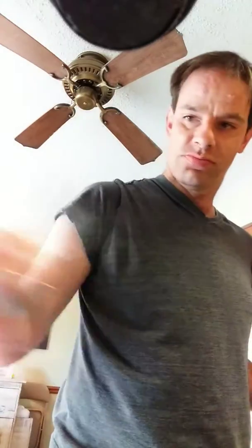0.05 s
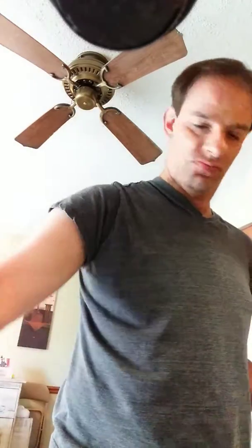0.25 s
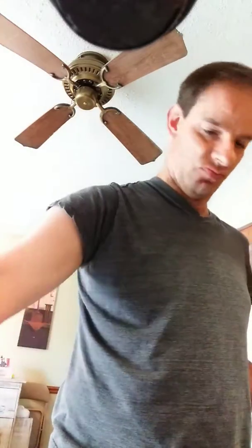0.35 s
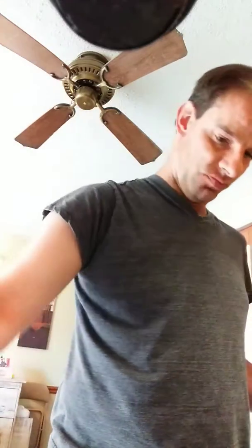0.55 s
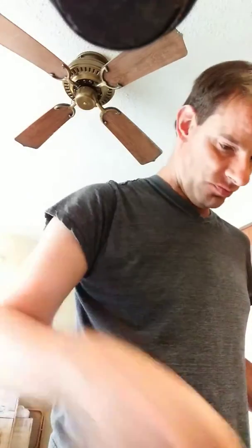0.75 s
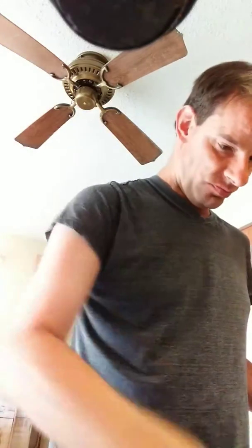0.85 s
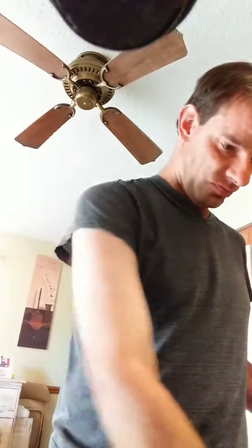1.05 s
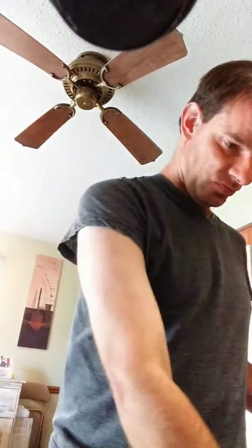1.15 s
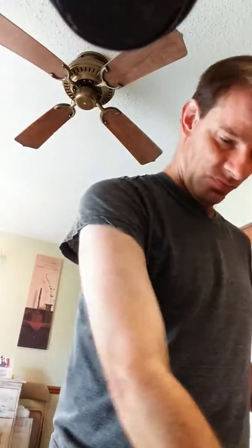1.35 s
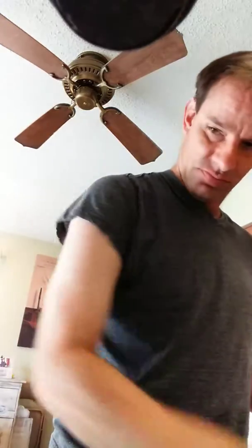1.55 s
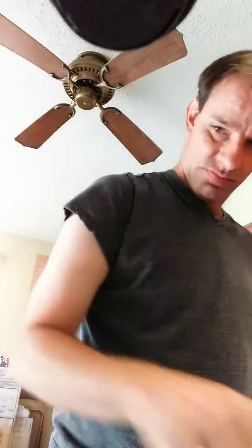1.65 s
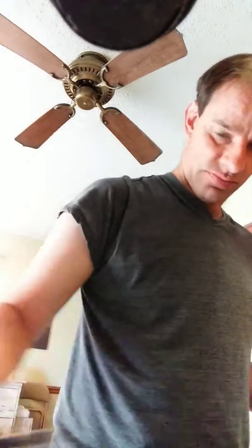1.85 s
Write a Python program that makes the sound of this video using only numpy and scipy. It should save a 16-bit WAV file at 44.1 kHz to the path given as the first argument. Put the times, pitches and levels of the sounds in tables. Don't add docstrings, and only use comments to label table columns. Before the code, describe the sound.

Dishes and cutlery clatter close to a phone in a small echoing kitchen. After quiet low hum, a heavy plate clacks at 0.24 s, a fork clinks, a bowl knocks, and a loud spoon rings left at 0.36. More steel drops at 0.47, with a rattle and hard counter thump at 0.51. A soft clink follows at 0.66, then dull taps from 0.97 to 1.25, ending in faint hum and air.

```python
import sys
import numpy as np
from scipy import signal
from scipy.fft import rfft, irfft, next_fast_len
from scipy.io import wavfile
from scipy.ndimage import map_coordinates

SR = 44100
rng = np.random.default_rng(int(sys.argv[2]) if len(sys.argv) > 2 else 0)


def boost(x):
    u = np.asarray(x, float) / 20
    return 10 ** u


def master_out(mix):
    frames = np.transpose(np.atleast_2d(mix))
    ceiling = np.clip(frames, -1, 1)
    pcm = np.round(ceiling * 32767).astype(np.int16)
    wavfile.write(sys.argv[1], SR, pcm)


N = 83790


def unit(x):
    return x / np.sqrt(np.mean(x ** 2) + 1e-20)


def along(points, hz):
    f, v = np.transpose(points)
    return np.interp(np.log(hz + 1), np.log(f + 1), v)


def curve(rows):
    s, v = np.transpose(rows)
    return np.interp(np.arange(N) / SR, s, v)


def wobble(rate):
    knots = rng.standard_normal(int(N * rate / SR) + 4)
    return map_coordinates(knots, [np.arange(N) * rate / SR])


def filtered(x, response):
    n = x.shape[-1]
    m = next_fast_len(n + 4096)
    return irfft(rfft(x, m) * response(np.fft.rfftfreq(m, 1 / SR)), m)[..., :n]


def add(out, s, x):
    part = out[:, round(s * SR):][:, :x.shape[1]]
    part += x[:, :part.shape[1]]


def sides(pan_db):
    return boost(np.array([[pan_db], [-pan_db]]) / 2)


def modal(f, depth_db=3.5, width_hz=110):
    return boost(depth_db * map_coordinates(rng.standard_normal(800), [f / width_hz]))


def ringing(t, pitches, modes, rattle_s, free_s):
    ring = 0
    touch_t60 = 0.03
    for hz, (level_db, t60) in zip(pitches, modes):
        spread_db = rng.normal(0, 1.5, (2, 1))
        start_phase = 0.1 * rng.uniform(0, 2 * np.pi)
        swell, drift = [map_coordinates(k, [t[1] * 95]) for k in rng.standard_normal((2, 64))]
        fall_db = -60 * np.maximum(t - rattle_s, 0) / t60
        fall_db = fall_db - 60 * np.maximum(t - free_s, 0) / touch_t60
        rough_db = 1.6 * swell * np.minimum(t / 0.0082, 1)
        phase = 2 * np.pi * hz * t + start_phase + 0.5 * drift * np.minimum(t / 0.0067, 1)
        ring = ring + boost(level_db + spread_db + rough_db + fall_db) * np.sin(phase)
    return ring


def clacking(t, clack_db, tilt_db, rattle_s, clack_t60, rise):
    def colour(f):
        return modal(f) * boost(tilt_db * np.log2(1 + f / 1500)) / (1 + (400 / (f + 1)) ** 3)

    noise = rng.standard_normal(t.shape) + 1.23 * rng.standard_normal(t.shape[1])
    noise = unit(filtered(noise, colour))
    when, size = rng.uniform(size=(2, 7))
    knocks = np.zeros(SR // 10)
    knocks[(when * rattle_s * SR).astype(int)] = 0.4 * size
    knocks[0] = 1
    crack_db, crack_t60 = 7, 0.0041
    fade = boost(-60 * t / clack_t60) + boost(crack_db - 60 * t / crack_t60)
    burst = boost(clack_db) * fade * noise * rise
    return signal.fftconvolve(burst, knocks[None], axes=1)[:, :t.shape[1]]


def struck(pitches, modes, hits, rattle_s, clack_t60, rise_s=0.00026, free_s=1):
    out = np.zeros((2, N))
    left_lag_s, ring_db = 0.0002513, -9
    t = np.maximum(np.arange(SR // 2) / SR - np.array([[left_lag_s], [0]]), 0)
    rise = 1 - np.exp(-t / rise_s)
    for s, db, clack_db, tilt_db, pan_db in hits:
        ring = boost(ring_db) * rise * ringing(t, pitches, modes, rattle_s, free_s)
        clack = clacking(t, clack_db, tilt_db, rattle_s, clack_t60, rise)
        add(out, s, boost(db) * sides(pan_db) * (ring + clack))
    return out


def plate():
    pitches = [425, 600, 748, 1405, 1850, 2040, 2412, 2620, 2870, 4050]
    # (level [dB], T60 [s])
    modes = [(-1, 0.062), (-9, 0.072), (-3, 0.17), (-16, 0.034), (7, .04), (5.5, 0.052), (9.5, 0.025),
             (4, 0.1243), (-5, 0.09), (-9, 0.034)]
    # (time [s], peak [dB], clack over ring [dB], clack tilt [dB/octave], left over right [dB])
    hits = [
        (0.2399, -11, -7, -13, -6),
        (0.292, -30, -0.5, -3, 9.5),
    ]
    return struck(pitches, modes, hits, rattle_s=0.005, clack_t60=0.04)


def fork():
    pitches = [2439, 5722, 7375, 8220, 11160, 12190, 13220, 14380, 15460]
    # (level [dB], T60 [s])
    modes = [(7.5, 0.07), (-1.5, 0.12), (-4, 0.12), (-8, 0.17), (-7, 0.36), (-14, .08), (-2.5, 0.2),
             (-1, 0.1), (-4, .1)]
    # (time [s], peak [dB], clack over ring [dB], clack tilt [dB/octave], left over right [dB])
    hits = [
        (0.2679, -20.5, -3, -0.5, 4.9),
    ]
    return struck(pitches, modes, hits, rattle_s=0.012, clack_t60=0.07)


def spoon():
    pitches = [3160, 5911, 7397, 8516, 9733, 11080, 13210, 14420, 14640]
    # (level [dB], T60 [s])
    modes = [(-21, 0.25), (-17.5, 0.12), (-18, 0.2), (-14.5, 0.25), (-13.5, 0.087), (-22.5, 0.37),
             (-10, 0.13), (-9, 0.08), (-13.5, 0.1)]
    # (time [s], peak [dB], clack over ring [dB], clack tilt [dB/octave], left over right [dB])
    hits = [
        (0.3552, -4, -18, -1.15, 12),
    ]
    return struck(pitches, modes, hits, rattle_s=0.015, clack_t60=0.08, rise_s=0.001)


def knife():
    pitches = [733, 4280, 5459, 6961, 8726, 10330, 11240, 13150, 14640, 15210]
    # (level [dB], T60 [s])
    modes = [(-9.5, 0.1), (-20, 0.11), (-3.5, 0.14), (-0.5, 0.14), (-12.5, 0.11), (-10, 0.052), (-6, 0.039),
             (2.5, 0.42), (-18, .15), (-8.5, .2)]
    # (time [s], peak [dB], clack over ring [dB], clack tilt [dB/octave], left over right [dB])
    hits = [
        (0.4694, -14.5, -12, 0, 13.7),
    ]
    return struck(pitches, modes, hits, rattle_s=0.01, clack_t60=0.07, free_s=0.04)


def ladle():
    pitches = [1793, 3332, 3925, 5907, 7391, 8511, 9184, 9733, 10400, 11180, 12500, 13155, 14400, 15388]
    # (level [dB], T60 [s])
    modes = [(-7.5, 0.036), (-11, 0.063), (-19, 0.32), (-7, 0.05), (-16.5, 0.16), (-3, 0.16), (-24, .1),
             (-14, 0.18), (-14, 0.065), (-18.5, 0.11), (-18, 0.12), (-12, 0.12), (-10, 0.13), (-4.5, 0.09)]
    # (time [s], peak [dB], clack over ring [dB], clack tilt [dB/octave], left over right [dB])
    hits = [
        (0.5104, -12, -9.5, -2.5, 13),
    ]
    return struck(pitches, modes, hits, rattle_s=0.055, clack_t60=0.1)


def tongs():
    pitches = [1500, 4253, 5916, 10420, 14100, 15360]
    # (level [dB], T60 [s])
    modes = [(-26, 0.038), (-2, 0.075), (4.5, 0.078), (5, .09), (-2, 0.19), (-0.5, 0.18)]
    # (time [s], peak [dB], clack over ring [dB], clack tilt [dB/octave], left over right [dB])
    hits = [
        (0.6622, -28, -6.5, 0, 12),
    ]
    return struck(pitches, modes, hits, rattle_s=0.006, clack_t60=0.05)


def bowl():
    pitches = [1600, 2450, 3800, 4600, 7900]
    # (level [dB], T60 [s])
    modes = [(-3, 0.045), (10, .03), (-7, 0.027), (-3.5, 0.031), (-1.5, 0.016)]
    # (time [s], peak [dB], clack over ring [dB], clack tilt [dB/octave], left over right [dB])
    hits = [
        (0.3273, -13.5, -11, -11, -1.5),
        (0.332, -27, -14.5, -13, -5),
        (0.376, -19.5, -4.5, -16, -3.5),
    ]
    return struck(pitches, modes, hits, rattle_s=0.003, clack_t60=0.04)


def cup():
    pitches = [3919, 3941, 4312]
    # (level [dB], T60 [s])
    modes = [(2, 0.2), (-4.5, 0.57), (-16.5, .15)]
    # (time [s], peak [dB], clack over ring [dB], clack tilt [dB/octave], left over right [dB])
    hits = [
        (0.377, -21, -26, -17.5, 2.7),
    ]
    return struck(pitches, modes, hits, rattle_s=0.02, clack_t60=0.03, rise_s=0.004)


def rack():
    pitches = [520, 1128, 1620, 2606, 3500]
    # (level [dB], T60 [s])
    modes = [(-4, 0.032), (-1, 0.023), (-16, 0.021), (-8.5, 0.014), (-16.5, 0.01)]
    # (time [s], peak [dB], clack over ring [dB], clack tilt [dB/octave], left over right [dB])
    hits = [
        (0.7877, -44, 4.5, -6.5, 1.5),
        (0.973, -32.5, -1, -13.5, -7),
        (1.072, -26.5, 1, -16.5, -2.5),
        (1.149, -35, -10, 0, -5.5),
        (1.177, -45.5, 10.5, -27, -5.5),
        (1.194, -16.5, -10.5, -12, 0),
    ]
    return struck(pitches, modes, hits, rattle_s=0.008, clack_t60=0.03, rise_s=0.0015)


def tub():
    pitches = [592, 1037, 2648, 3470, 6390, 6910, 11300, 13300]
    # (level [dB], T60 [s])
    modes = [(3.5, 0.031), (-1.5, 0.013), (-3, 0.015), (-11, 0.016), (-9, .02), (-17.5, .02),
             (-12.5, 0.015), (-7, .02)]
    # (time [s], peak [dB], clack over ring [dB], clack tilt [dB/octave], left over right [dB])
    hits = [
        (1.2395, -25, -6, -6, -0.86),
    ]
    return struck(pitches, modes, hits, rattle_s=0.014, clack_t60=0.05, rise_s=0.001)


def ticks():
    # (time [s], peak [dB], clack over ring [dB], clack tilt [dB/octave], left over right [dB])
    hits = [(0.258, -37, 0, 0, 6), (0.291, -27, 0, -8.5, 9), (0.2932, -29.5, 0.0089, -11, -3),
            (0.3386, -22.5, 0.021, -0.5, -2), (0.402, -27.5, 0, -3.5, 5), (0.413, -23.5, 0.0013, 1.5, 4),
            (.6665, -30.5, 0, 6.5, 8), (0.7956, -51, 0, 9, 12), (1.1150, -49.5, 0, -5.5, 2),
            (1.1822, -47, 0, 3, -3), (1.2037, -39, 0, -9, 14), (1.2470, -37.5, 0, -14, 7),
            (1.2560, -32, 0, -17, -4)]
    return struck([], [], hits, rattle_s=0.001, clack_t60=0.012)


def settling(spells, colour):
    def glassy(f):
        return modal(f, 7 * np.clip(f / 6000, 0.4, 1), 50) * boost(along(colour, f))

    level, t = np.zeros(N), np.arange(N) / SR
    for s, length, db in spells:
        u = np.clip((t - s) / length, 0, 1)
        level += boost(db) * np.minimum(u * 12, 1) * (1 - u) ** 1.69
    grains = rng.standard_normal((2, N)) * boost(3.5 * wobble(220))
    return level * unit(filtered(grains, glassy))


def jingle():
    # (start [s], length [s], rms [dB])
    slides = [(0.255, 0.094, -22.5), (0.321, 0.28, -24.5), (0.464, 0.26, -29), (0.646, 0.24, -41.5),
              (1.068, 0.063, -50.5), (1.141, 0.13, -52.5), (1.254, 0.079, -77)]
    # (frequency [Hz], level [dB])
    colour = [(250, -9.5), (500, -2.5), (1500, 2.5), (4000, -0.5), (8000, -16), (15500, -34)]
    return settling(slides, colour)


def rustle():
    # (start [s], length [s], rms [dB])
    rustles = [(.262, 0.054, -48), (.51, 0.2, -24), (.663, .12, -43.5), (1.074, 0.077, -64),
               (1.145, 0.057, -53), (1.24, 0.23, -60.5)]
    # (frequency [Hz], level [dB])
    colour = [(2000, -25), (5000, 2), (9000, -9), (13000, 1), (15500, 2)]
    return settling(rustles, colour)


def kitchen(x):
    # (frequency [Hz], T60 [s])
    fade = [(200, 0.54), (2000, 0.27), (8000, 0.34), (16000, 0.21)]
    hop, out = round(0.04 * SR), np.zeros((2, N))
    mono = np.pad(x.mean(0), (hop, 2 * hop))
    for start in range(0, N, hop):
        hz, t, z = signal.stft(rng.standard_normal((2, SR // 2)), SR, nperseg=256)
        z = z * boost(-60 * t / along(fade, hz)[:, None])
        tail = signal.istft(z, SR, nperseg=256)[1]
        piece = mono[start:start + 2 * hop] * np.sqrt(np.hanning(2 * hop))
        piece = np.pad(piece, (200, 0))
        wet = signal.fftconvolve(piece[None], tail / np.linalg.norm(tail[0]), axes=1)
        add(out, max(start - hop, 0) / SR, wet[:, max(hop - start, 0):])
    return out


def counter():
    starts = [.5155, .5109, .5104, .5147, .972, .974, .292, 1.243]
    # (peak [dB], pitch [Hz], T60 [s], left over right [dB])
    pushes = [(-6, 75, 0.08, 22), (-0.5, 660, 0.0037, 24), (-18, 240, 0.032, 34.5), (-3.5, 550, .006, 33),
              (-25.5, 126, 0.17, 2), (-28.5, 285, 0.14, 4.5), (-26.5, 140, 0.57, -5.5),
              (-24, 148, 0.088, -5.5)]
    out, t = np.zeros((2, N)), np.arange(SR // 4) / SR
    for s, (db, hz, t60, pan_db) in zip(starts, pushes):
        level = boost(db - abs(pan_db) / 2 - 60 * t / t60)
        push = level * np.sin(2 * np.pi * hz * t / (1 + 0.28 * t / t60))
        add(out, s, push * sides(pan_db))
    return out


def hum():
    pitches = [120, 240, 290, 476, 725, 960, 1080]
    levels = [-37.5, -44, -51.5, -57, -62.5, -70.5, -68.5]
    t = np.arange(N) / SR
    out = 0
    for hz, db in zip(pitches, levels):
        level = boost(db + 4.0 + 1.5 * wobble(20))
        phase = 2 * np.pi * (hz * t + rng.uniform()) + 0.028 * wobble(14.7)
        right_shift = np.array([[0], [0.052 * rng.normal()]])
        out = out + level * np.sin(phase + right_shift)
    return out


def air():
    # (frequency [Hz], level [dB])
    colour = [(25, -14), (60, -3), (150, 2.5), (300, -7.5), (700, -12), (2000, -20), (4500, -33),
              (8500, -68), (16000, -54.5)]
    # (frequency [Hz], correlation [ratio, clipped to -1 to 1 after interpolation])
    alike = [(60, -0.5), (240, 1.5), (950, -0.04), (3770, -0.01), (15000, -4)]

    def mid_side(f):
        angle = np.arccos(np.clip(along(alike, f), -1, 1)) / 2
        return boost(along(colour, f)) * [np.cos(angle), np.sin(angle)]

    mid, side = filtered(rng.standard_normal((2, N)), mid_side)
    return boost(-44.5 + 1.2 * wobble(7)) * unit(np.array([mid + side, mid - side]))


def draught():
    # (time [s], level [dB])
    loudness = [(0, -61), (.7, -69.5), (1.0, -64), (1.35, -71), (1.7, -76), (1.74, -58.5), (1.9, -62.5)]
    noise = rng.standard_normal((2, N))
    hiss = unit(filtered(noise, lambda f: f / (f + 1500) / (1 + (f / 3600) ** 3)))
    return boost(curve(loudness)) * hiss


def background():
    # (time [s], level [dB])
    gain = [(0, -36.5), (.05, -35.5), (.45, -34.5), (.62, -40), (.72, -41.5), (1.2, -40.5), (1.7, -41.5),
            (1.8, -37), (1.9, -35.5)]
    return boost(curve(gain) + 38.5) * (hum() + air()) + draught()


def scene():
    near = plate() + fork() + spoon() + knife() + ladle() + tongs()
    near = near + bowl() + cup() + rack() + tub() + ticks()
    near = near + jingle() + rustle()
    room_db = -5.5
    return near + boost(room_db) * kitchen(near) + counter() + background()


def band_limit(x):
    return signal.sosfilt(signal.butter(12, 16630, fs=SR, output="sos"), x)


def record(dry):
    def band(f):
        low_cut_hz, top_hz = 70.4, 15650
        return 1 / (1 + (low_cut_hz / (f + 1)) ** 2) / (1 + (f / top_hz) ** 90)

    ends = np.minimum(np.minimum(np.arange(N), N - np.arange(N)) / 90, 1)
    self_noise = boost(-77.5) * rng.standard_normal(dry.shape)
    x = filtered(ends * (dry + self_noise), band)
    ceiling = 0.95
    mix = x / (1 + np.abs(x / ceiling) ** 4) ** (1 / 4)
    return band_limit(mix)


dry = scene()
out = record(dry)
master_out(out)
```